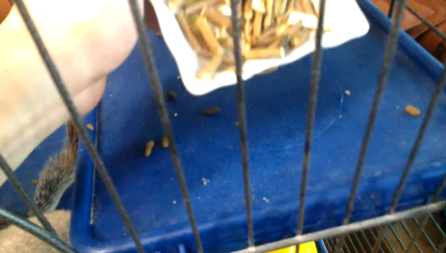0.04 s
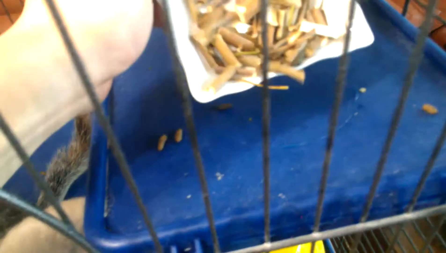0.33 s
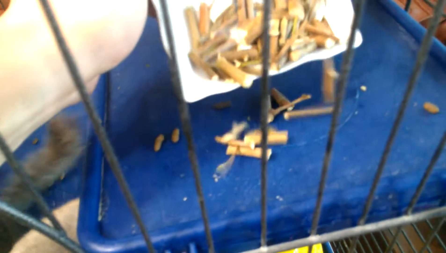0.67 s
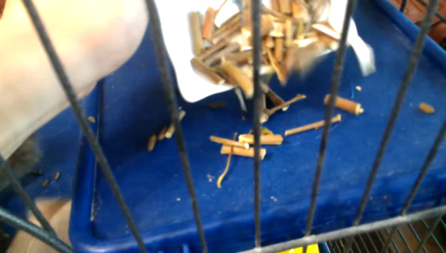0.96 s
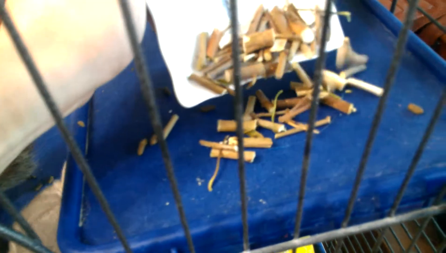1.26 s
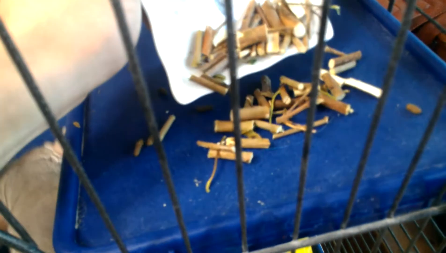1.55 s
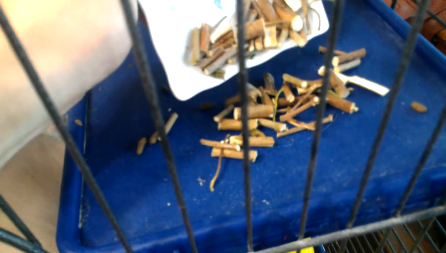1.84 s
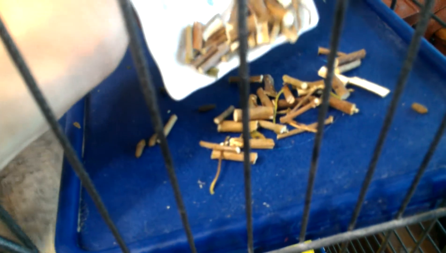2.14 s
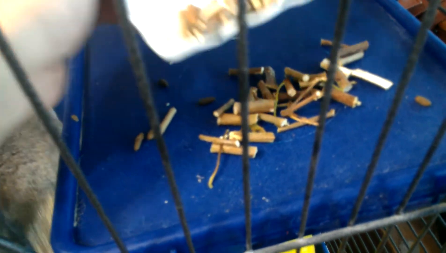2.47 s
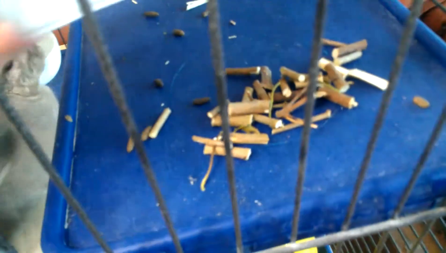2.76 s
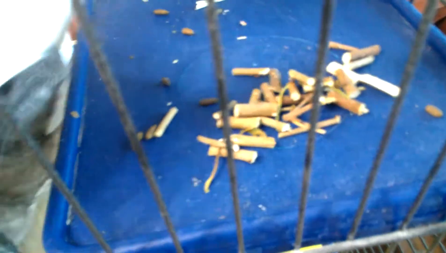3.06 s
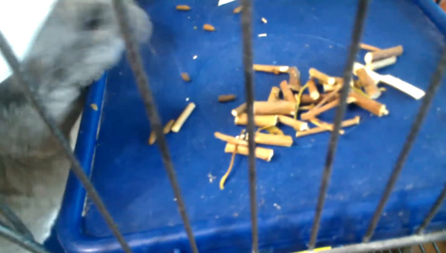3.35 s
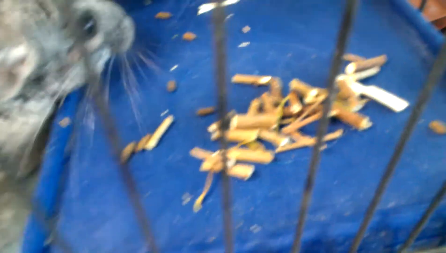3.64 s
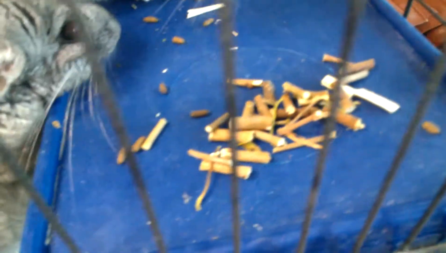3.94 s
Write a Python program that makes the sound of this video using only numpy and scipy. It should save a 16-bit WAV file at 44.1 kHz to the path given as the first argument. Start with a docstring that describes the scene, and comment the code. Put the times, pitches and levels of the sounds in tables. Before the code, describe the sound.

Dry sticks patter onto a plastic tray, then a dish clanks loudly against cage bars.

```python
"""Dry sticks slide from a ceramic dish in two pours and patter on a pet cage's plastic tray, close up.
Each stick bounces and rings briefly; they scuff over each other, and pushes make the tray thud.
Then the dish knocks the cage bars: a loud double clank that overloads the microphone, and the wires
ring on. The place is a small room with faint shuffling in the cage, heard on a close stereo
microphone with the treble leaning right."""
import sys
import numpy as np
from scipy import signal
from scipy.fft import rfft, irfft
from scipy.io import wavfile

SR = 44100
rng = np.random.default_rng(int(sys.argv[2]) if len(sys.argv) > 2 else 0)


def to_wav(sig):
    """Store sig (one row per channel, or 1-D mono) as 16-bit WAV at the path in sys.argv[1].

    Samples outside -1..1 are clipped; the rate is SR.
    """
    pcm = np.clip(np.atleast_2d(sig), -1, 1) * 32767
    pcm = np.round(pcm).astype(np.int16)
    wavfile.write(sys.argv[1], SR, pcm.T)  # frames by channels


N = 176400
TIME = np.arange(N) / SR

# Room tone spectrum: f/Hz, level/dB
ROOM_TONE = [(30, -35.5), (80, -16), (130, -6.5), (250, -2.5), (1400, -15.5), (5000, -25), (14000, -22.5)]
# Loudness of the shuffling: t/s, level/dB
SHUFFLE_LEVEL = [(0, -66), (2.65, -64.5), (2.74, -58), (2.93, -53.5), (3.08, -46), (3.55, -51),
                 (3.66, -57.5), (3.85, -52.5), (4, -53)]
# Shuffling spectrum: f/Hz, level/dB
SHUFFLE_COLOUR = [(50, -34), (130, -9), (240, -1.5), (420, -8.5), (1500, -17.5), (5000, -27),
                  (14000, -35.5)]
# Room decay: f/Hz, t60/s
ROOM_T60 = [(100, 0.37), (300, 0.53), (1000, 0.43), (4000, 0.34), (8000, 0.27)]
# Diffuse sound at the microphone: f/Hz, left-right correlation
STEREO_LIKENESS = [(30, 0.21), (130, 1), (500, 0.85), (1100, 0.29), (2000, 0.031)]
# Stereo balance: f/Hz, right minus left/dB
RIGHT_LEAN = [(700, -1.4), (2000, 0), (4000, 3.5), (7500, 5.5)]
# Cage wire modes: f/Hz, level/dB, t60/s
WIRE_MODES = [(371, -50, 1.5), (678, -36, 1.2), (791, -42, .9), (1320, -39.5, 1.2), (1430, -42, 1.1),
              (2200, -40.5, 1.2), (3650, -42, 1.1), (7600, -44.5, .8)]
# Wire buzz spectrum: f/Hz, level/dB
WIRE_BUZZ = [(200, -24.5), (700, -1.5), (3500, -1.5), (7000, -14.5), (14000, -22)]
# Blows on the bars: t/s, ring level/dB, crack level/dB, most excited f/Hz
BAR_HITS = [(2.9505, 7.5, -6.5, 7240), (2.957, -12.5, -8, 9000), (2.970, -21, -8, 6000)]
# Bar modes: f/Hz, level/dB, t60/s
BAR_MODES = [(3693, -8.5, 0.03), (4043, -21, 0.17), (7045, -2.5, 0.013), (10655, -8.5, 0.04)]
# Knocks of the dish: t/s, crack level/dB, then low, middle and high mode level/dB
DISH_HITS = [(.428, -65, -57, -55, -62), (.471, -50, -41, -41.5, -45.5), (.548, -56, -56, -50, -59),
             (1.005, -59, -62, -55, -57), (2.890, -58, -55, -70, -44), (2.9848, -2.5, -31, -28, -27),
             (2.996, -7.5, -27.5, -40, -36)]
# Dish modes: f/Hz, t60/s
DISH_MODES = [(3150, .11), (4323, .09), (5765, .07)]
# Tone of the cracks on bars and dish: f/Hz, gain/dB
BAR_CRACK = [(60, -14), (200, 3), (1100, 13.5), (2000, 10), (7000, 12.5), (13000, 11.5)]
DISH_CRACK = [(90, -13), (200, 13), (1600, 10.5), (2600, 18.5), (4000, 15.5), (9000, 9.5), (13000, 0)]
# Dull pushes on the tray: t/s, peak level/dB
TRAY_BUMPS = [(0.722, -26), (0.744, -49), (1.398, -26.5), (1.742, -29), (2.026, -36), (2.716, -43),
              (2.956, -31.5), (2.984, -28)]
# Low tray modes: f/Hz, level/dB, t60/s
TRAY_MODES = [(142, -1, .13), (188, -2, .09), (240, 0, .07), (412, 3, .06), (450, -3, .05), (630, -3, .04),
              (790, -1, .04)]
# Tone the tray gives each tap: f/Hz, gain/dB
TRAY_COLOUR = [(85, -23.5), (160, -7), (420, -1), (540, -3.5), (750, 1.5), (2200, 0), (14000, -2.5)]
# A brief soft hiss as the microphone opens (first row), then scuffs: t/s, length/s, level/dB
HISS_AND_SCUFFS = [(0.079, 0.072, -54.5), (0.408, 0.32, -54.5), (0.63, 0.12, -41), (1.062, 0.12, -45),
                   (1.673, 0.1, -55.5), (3.098, 0.028, -57), (3.305, .13, -62.5), (3.505, 0.07, -54.5)]
# Spectrum of that hiss and the scuffs: f/Hz, level/dB
GRAIN_COLOUR = [(100, -17.5), (700, 2), (2000, 1.5), (8000, 0), (11500, -0.5), (14000, -3)]
# Sticks landing: t/s, relative level/dB, treble corner f/Hz (hardness), stick f/Hz
LANDINGS = [(0.5717, -9.5, 3800, 2050), (0.581, -9.5, 2430, 1990), (0.6032, -6.5, 6250, 4460),
            (0.6445, -12.5, 9100, 4760), (0.6863, -19.5, 7000, 4070), (0.6949, -11, 6640, 4200),
            (0.706, -16, 7000, 2500), (.721, -15, 2400, 1710), (0.799, -11.5, 5270, 2300),
            (.811, -22, 6400, 3630), (.8395, -32.5, 3000, 2000), (1.0225, -19.5, 3980, 2100),
            (1.034, -19, 3530, 2080), (1.055, -16.5, 2960, 1820), (1.077, -14.5, 5150, 2110),
            (1.079, -11, 4100, 2000), (1.0938, -7, 8200, 7100), (1.113, -14, 5800, 2200),
            (1.1367, -13, 2840, 1800), (1.156, -14, 6650, 1900), (1.213, -19, 3000, 1750),
            (1.221, -22, 8800, 3960), (1.2471, -15.5, 9600, 2280), (1.2871, -9.5, 6230, 2100),
            (1.297, -18.5, 7940, 2720), (1.326, -9, 6840, 4720), (1.366, -19.5, 4930, 2320),
            (1.38, -22.5, 4930, 2560), (1.397, -9.5, 2270, 745), (1.402, -21, 1780, 960),
            (1.4304, -17, 2170, 1100), (1.474, -20.5, 2120, 850), (1.4988, -23.5, 7100, 2780),
            (1.531, -24.5, 2420, 1180), (1.562, -30, 2760, 1300), (1.587, -33, 3980, 2000),
            (1.687, -13.5, 6840, 2830), (1.7154, -18.5, 3480, 1080), (1.776, -22, 3040, 1210),
            (1.812, -25, 5830, 1330), (1.894, -23, 2000, 1160), (2.091, -26.5, 5160, 4730)]


def amp(db):
    """Decibels to gain."""
    return 10 ** (np.asarray(db) / 20)


def unit(x):
    """Scales to rms 1."""
    return x / np.sqrt(np.mean(x ** 2) + 1e-20)


def decay(t, t60):
    """Envelope falling 60 dB in t60 seconds."""
    return np.exp(-np.log(1000) * t / t60)


def read(points, hz):
    """Reads a table on a log-frequency axis."""
    f, value = np.transpose(points)
    return np.interp(np.log(hz + 1), np.log(f + 1), value)


def add(mix, start_s, sound):
    """Mixes a sound in at a time."""
    part = mix[max(round(start_s * SR), 0):][:len(sound)]
    part += sound[:len(part)]


def colour(x, points, size=4096):
    """Minimum-phase filter shaped by points of f/Hz, gain/dB."""
    log_gain = np.log(amp(read(points, abs(np.fft.fftfreq(size, 1 / SR)))))
    taps = np.fft.ifft(np.exp(np.conj(signal.hilbert(log_gain)))).real[:size // 2]
    return np.apply_along_axis(lambda v: signal.oaconvolve(v, taps)[:len(v)], -1, x)


def diffuse(size):
    """Stereo noise, alike in the bass and unrelated in the treble."""
    left, other = rfft(rng.standard_normal((2, size)))
    same = read(STEREO_LIKENESS, np.fft.rfftfreq(size, 1 / SR))
    return irfft([left, same * left + np.sqrt(1 - same ** 2) * other], size)


def ring(modes, detune=0):
    """Dying sines of a struck object."""
    t = TIME[:N // 2]
    return sum(amp(db) * decay(t, t60) * np.sin(2 * np.pi * hz * (1 + detune * rng.uniform(-1, 1)) * t)
               for hz, db, t60 in modes)


def blow(corner_hz, chatter, chatter_s, size=2048):
    """A contact pulse with brief chatter, duller for a softer contact; energy 1."""
    burst = rng.standard_normal(size) * np.exp(-TIME[:size] / chatter_s)
    burst *= chatter / np.linalg.norm(burst)
    burst[0] += 1
    pulse = signal.lfilter(*signal.butter(2, corner_hz, fs=SR), burst)
    return pulse / np.linalg.norm(pulse)


def background(tone_db=-58.5):
    """Steady room tone and soft shuffling in the cage."""
    swell = amp(np.interp(TIME, *np.transpose(SHUFFLE_LEVEL)))
    shuffle = swell * unit(colour(diffuse(N), SHUFFLE_COLOUR))
    return amp(tone_db) * unit(colour(diffuse(N), ROOM_TONE)) + shuffle


def room(x, tail_db=-5, early_db=-4, early_s=0.011, path_sets=3):
    """Quick reflections off tray and cage, then the small room's tail."""
    out, t = np.zeros((2, N)), TIME[:SR]
    for k in range(path_sets):
        hz, when, spectrum = signal.stft(diffuse(SR), SR, nperseg=256)
        spectrum *= decay(when, read(ROOM_T60, hz)[:, None])
        tail = signal.istft(spectrum, SR, nperseg=256)[1][:, :SR]
        tail *= np.clip(t / 0.0056, 0, 1) ** 2
        early = diffuse(SR) * np.exp(-t / early_s) * (t > .0006)
        paths = (amp(tail_db) * unit(tail) + amp(early_db) * unit(early)) / np.sqrt(SR)
        # crossfade the sets, so the paths change from blow to blow
        share = np.sqrt(2 / path_sets) * np.cos(np.pi * (5 * TIME + k / path_sets))
        out += signal.fftconvolve((x * share)[None], paths, axes=1)[:, :N]
    return out


def wires(count=4, buzz_db=-47.5):
    """Many slightly unlike wires ring and buzz on from the first blow on the bars."""
    out, t = np.zeros((2, N)), TIME[:N // 2]
    buzz = amp(buzz_db) * unit(colour(diffuse(len(t)), WIRE_BUZZ)) * decay(t, t60=1.8)
    shared = ring(WIRE_MODES)
    for side, side_buzz in zip(out, buzz):
        unlike = sum(ring(WIRE_MODES, detune=.022) for _ in range(count))
        add(side, BAR_HITS[0][0], side_buzz + (shared + unlike) / np.sqrt(count + 1))
    return out


def bars(focus_db_per_octave=12, rise_s=0.001):
    """Struck cage bars: a chattering crack, and a ring whose balance depends on the spot hit."""
    rings, cracks = np.zeros((2, N))
    for s, ring_db, crack_db, focus_hz in BAR_HITS:
        body = ring([(hz, db - focus_db_per_octave * abs(np.log2(hz / focus_hz)), t60)
                     for hz, db, t60 in BAR_MODES])
        attack = 1 - np.exp(-TIME[:len(body)] / rise_s)
        add(rings, s, amp(ring_db) * body * attack)
        add(cracks, s, amp(crack_db) * blow(corner_hz=19000, chatter=6.4, chatter_s=0.011))
    return rings + colour(cracks, BAR_CRACK)


def dish(twin_ratio=1.022, twin_db=-7):
    """Knocked ceramic: a crack and a short ring. Not quite round, so each mode beats with a twin."""
    rings, cracks = np.zeros((2, N))
    for s, crack_db, *mode_levels in DISH_HITS:
        for (hz, t60), db in zip(DISH_MODES, mode_levels):
            add(rings, s, ring([(hz, db, t60), (hz * twin_ratio, db + twin_db, t60)]))
        add(cracks, s, amp(crack_db) * blow(corner_hz=12000, chatter=5, chatter_s=0.00524))
    return rings + colour(cracks, DISH_CRACK)


def tray_bumps(firm_db=-27, knee_hz=422, low_cut_hz=147, rise_s=0.00588):
    """Pushes set the whole tray ringing low; weak ones lose the modes above the knee."""
    out = np.zeros(N)
    for s, db in TRAY_BUMPS:
        tilt = 0.5 * min(db - firm_db, 0)  # dB per octave
        body = ring([(hz, level + tilt * max(np.log2(hz / knee_hz), 0), t60)
                     for hz, level, t60 in TRAY_MODES])
        body *= np.minimum(TIME[:len(body)] / rise_s, 1)
        thud = signal.lfilter(*signal.butter(2, low_cut_hz, "high", fs=SR), body)
        add(out, s, amp(db) * thud / abs(thud).max())
    return out


def hiss_and_scuffs(grains_per_s=2000, spread_db=-4.5, grain_s=0.00098):
    """Swells of grainy noise: a brief soft hiss as the microphone opens, then dry rubbing scuffs."""
    strengths = rng.standard_normal(N) * amp(spread_db * np.minimum(rng.exponential(1, N), 4))
    clicks = strengths * (rng.random(N) < grains_per_s / SR)
    envelope = signal.lfilter([1], [1, -np.exp(-1 / (grain_s * SR))], abs(clicks))
    grains = colour(rng.standard_normal(N) * envelope, GRAIN_COLOUR)
    out = np.zeros(N)
    for s, length, db in HISS_AND_SCUFFS:
        part = grains[round(s * SR):][:round(length * SR)]
        add(out, s, amp(db) * unit(part * signal.windows.tukey(len(part), .5)))
    return out


def sticks(gain_db=9.5, rebound_db=-12, flight_s=(.005, .022), overtone=2.76, q=6.7):
    """Each stick lands on the tray and rebounds twice, ringing briefly in two bending modes."""
    out, hz = np.zeros(N), np.fft.rfftfreq(2048, 1 / SR) + 1
    lag_s = .0013  # of the tray's bending waves at 1 kHz; treble arrives sooner than bass
    dispersion = np.exp(-2j * np.pi * lag_s * 2 * np.sqrt(1000 * hz))
    for s, db, corner_hz, pitch_hz in LANDINGS:
        for bounce in range(3):
            body = 1 + sum(0.44 / (1 + 1j * q * (hz / f - f / hz))
                           for f in (pitch_hz, pitch_hz * overtone))
            contact = blow(corner_hz, chatter=0.95, chatter_s=0.0015)
            tap = irfft(rfft(contact) * body * dispersion)
            add(out, s, amp(db + gain_db + rebound_db * np.sqrt(bounce)) * tap / np.linalg.norm(tap))
            s += rng.uniform(*flight_s)
            pitch_hz *= np.exp(rng.normal(scale=.25))
    return colour(out, TRAY_COLOUR)


def scene(clank_send_db=-0.5):
    """The cage from close by with the room around it; the treble leans right."""
    patter = sticks() + hiss_and_scuffs() + tray_bumps()
    clank = dish() + bars()
    left, right = patter + clank + room(patter + amp(clank_send_db) * clank) + wires()
    left = colour(left, [(hz, -db / 2) for hz, db in RIGHT_LEAN])
    right = colour(right, [(hz, db / 2) for hz, db in RIGHT_LEAN])
    return np.array([left, np.roll(right, 1)]) + background()


def record(dry, start_s=.107, top_hz=14100):
    """The close microphone opens after a brief silence, clips on the clank and loses the top treble."""
    clipped = np.clip(dry * (TIME > start_s), -1, 1)
    lowpass = signal.firwin(401, top_hz, window=("kaiser", 8), fs=SR)
    return signal.oaconvolve(clipped, lowpass[None], "same")


dry = scene()
out = record(dry)
to_wav(out)
```